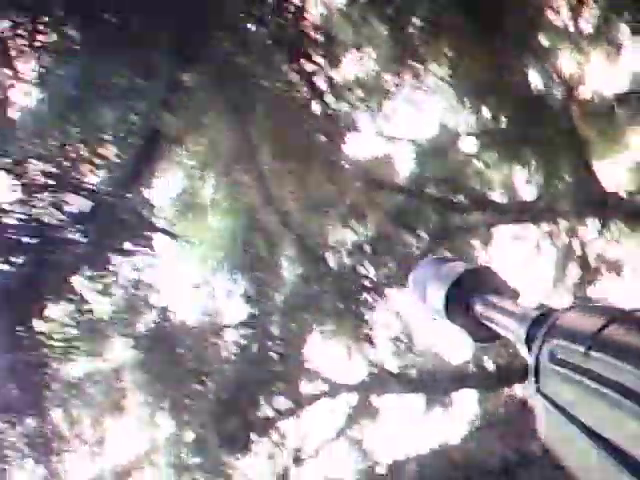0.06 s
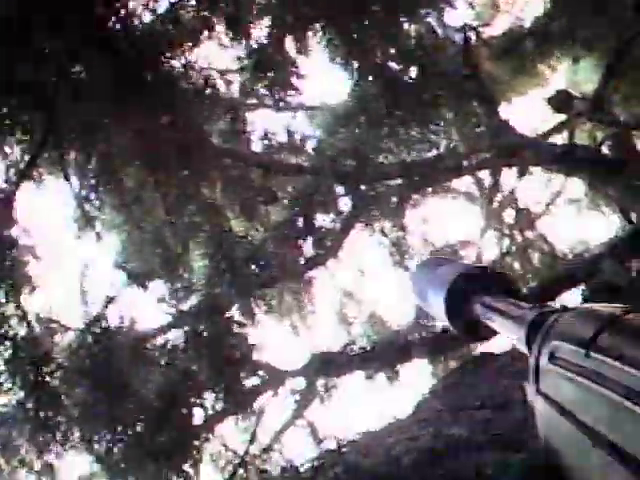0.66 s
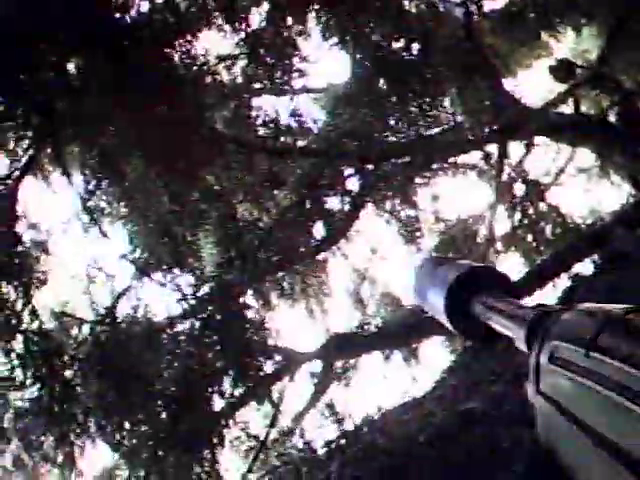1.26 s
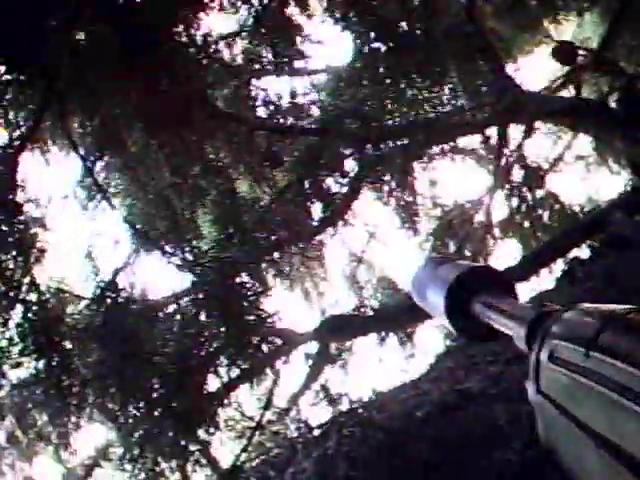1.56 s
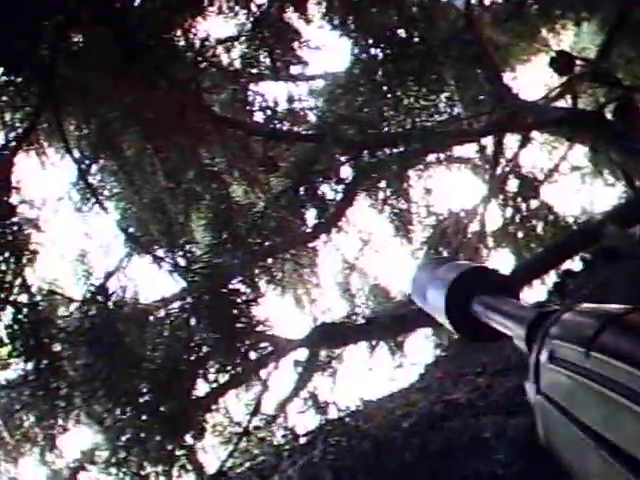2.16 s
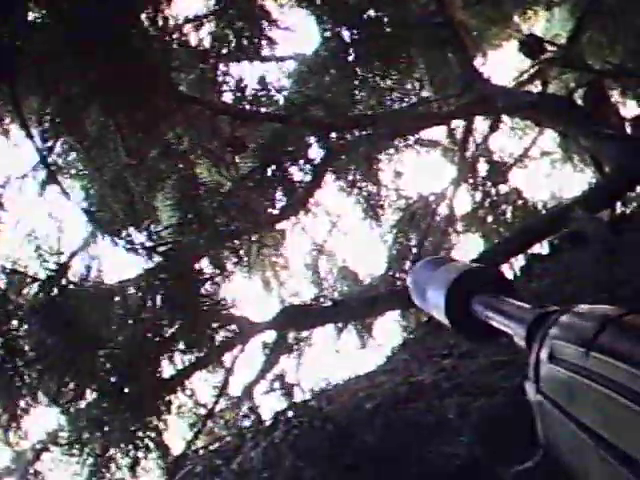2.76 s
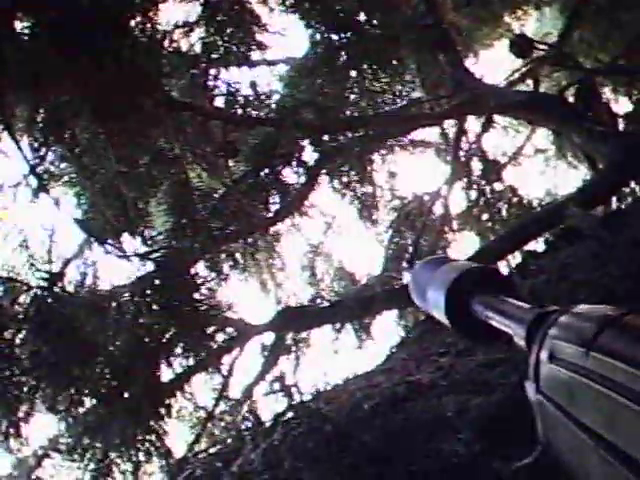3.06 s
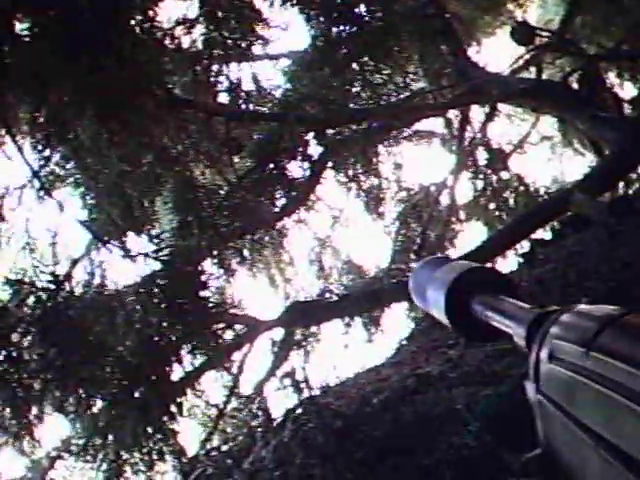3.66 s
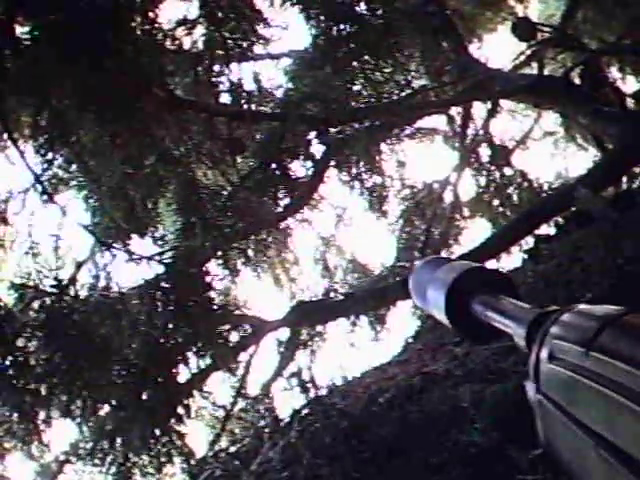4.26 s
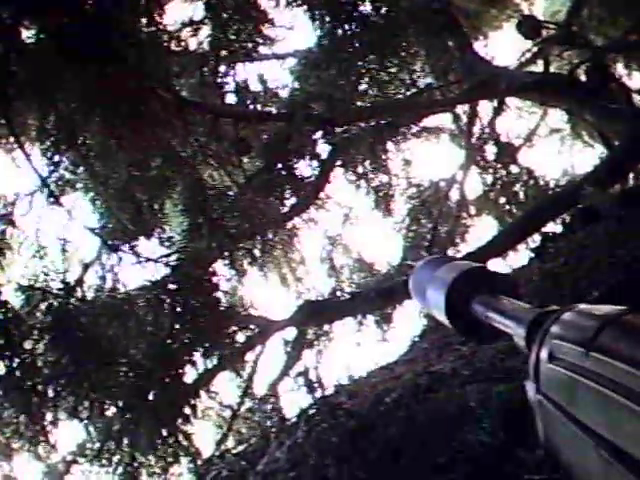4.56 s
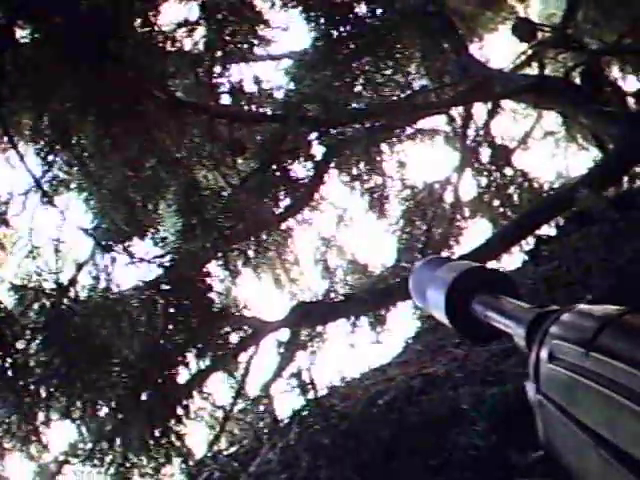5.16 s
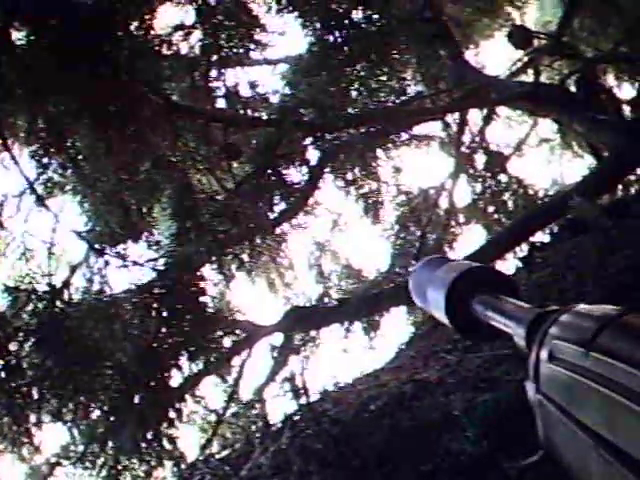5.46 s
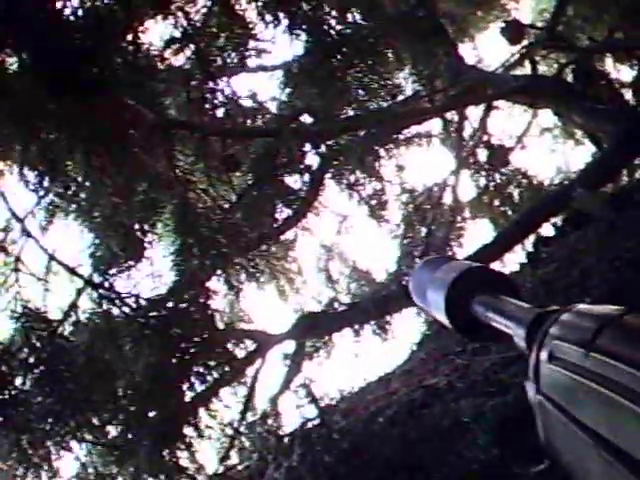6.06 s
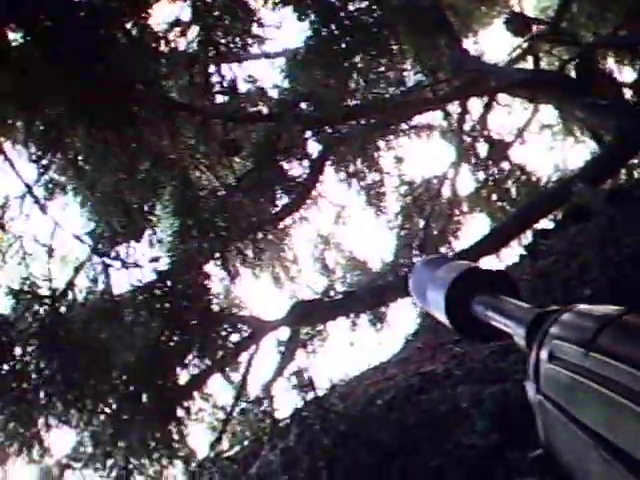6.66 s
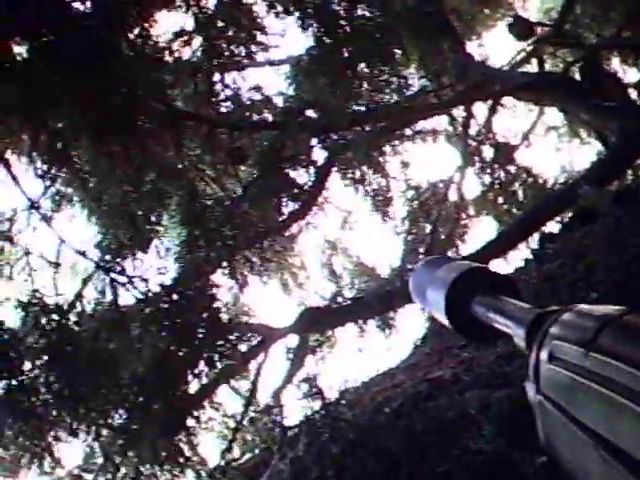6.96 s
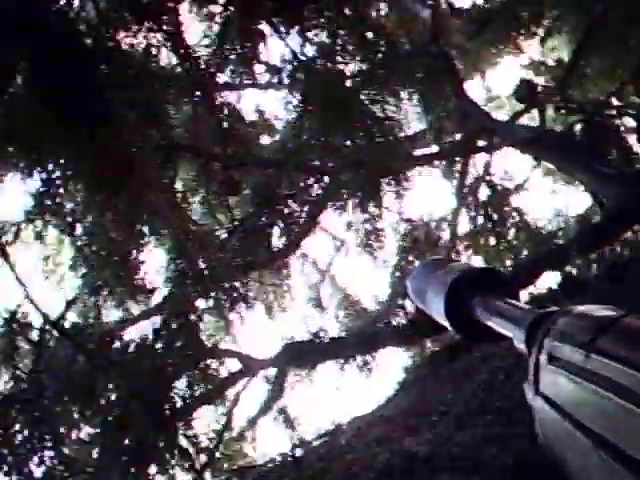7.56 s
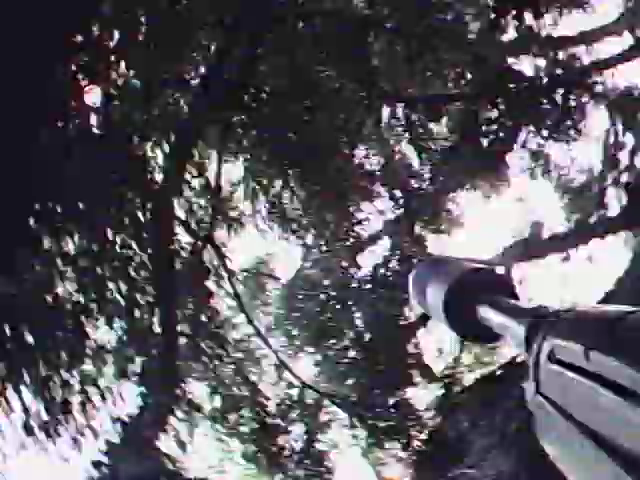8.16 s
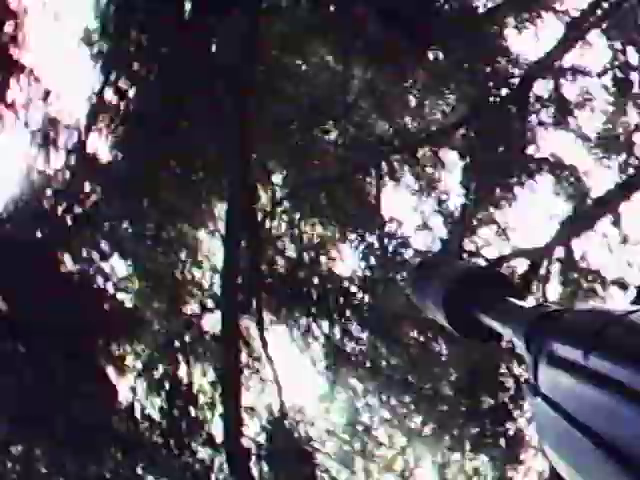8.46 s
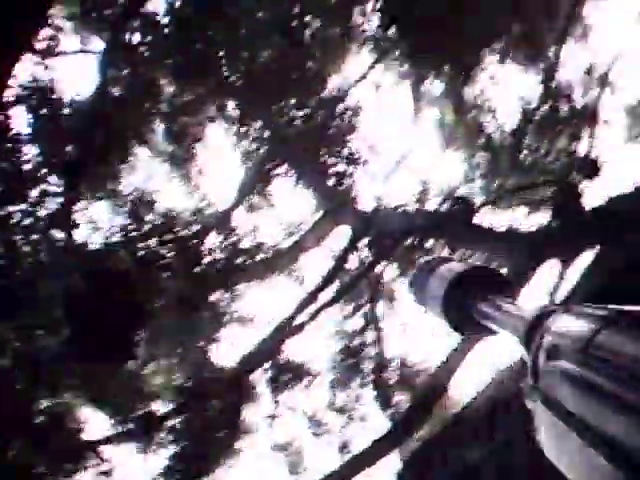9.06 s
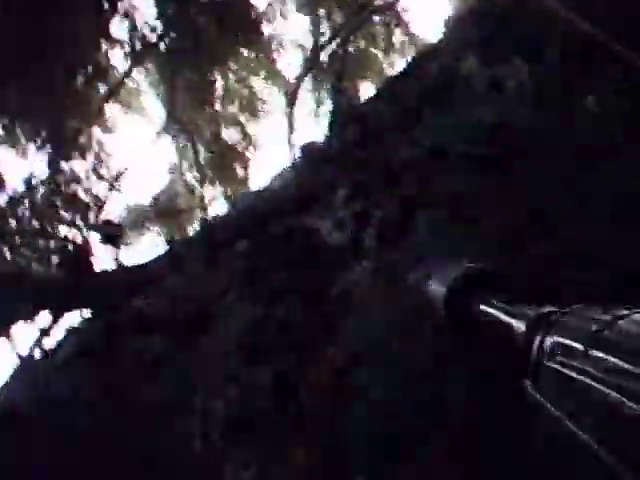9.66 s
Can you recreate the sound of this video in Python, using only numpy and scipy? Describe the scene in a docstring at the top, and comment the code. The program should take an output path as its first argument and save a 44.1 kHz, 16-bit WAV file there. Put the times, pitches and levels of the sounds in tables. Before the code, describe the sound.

Dull knocks, clicks and sleeve scraping on a handled rifle, heard through a camera clamped to it, over faint hiss and ticking.

```python
"""Knocks ring a small camera clamped to a rifle as it is aimed up into a tree, held still, then swung down.
Each knock travels through the mount, rings the camera's case and rocks the whole camera. A tight joint
creaks, hands and a sleeve scrape along the stock, and loose fittings tap. Underneath, the electronics
hiss and tick. It all sounds dull, as the camera keeps no high treble, and the hardest jolt overloads it."""
import sys
import numpy as np
from scipy import signal
from scipy.fft import rfft, irfft
from scipy.io import wavfile
from scipy.ndimage import uniform_filter1d

SR = 44100
rng = np.random.default_rng(int(sys.argv[2]) if len(sys.argv) > 2 else 0)


def to_wav(s):
    """Save 16-bit WAV."""
    ch = np.atleast_2d(s).T  # columns
    pcm = np.round(np.clip(ch, -1, 1) * 32767)  # PCM
    wavfile.write(sys.argv[1], SR, pcm.astype(np.int16))


N = 437472
TIME = np.arange(N) / SR
RING_SAMPLES = 20000

# knocks on rifle and mount: t/s, strength/dB, hardness (treble tilt)/dB, rocking relative to strength/dB
KNOCKS = [(0.425, -26, -3.5, 4.5), (0.742, -35.5, -4, -1), (1.198, -11, 4, -19.5), (2.105, -28.5, -1.5, 0),
          (2.18, -37.5, -5, 7.5), (2.358, -7, 2.5, -11.5), (2.473, -36.5, -16, 4.5), (2.61, -21.5, -4, -5),
          (2.656, -24.5, -3.5, 3), (2.668, -11, 5.5, -17), (2.913, -46, -16, -3), (3.124, -37.5, 1, -3),
          (4.232, -33.5, -11, 3.5), (4.375, -19.5, 0.5, -15.5), (4.46, -33, 3.5, -16), (5.007, -36, -1, -6),
          (5.359, -30.5, 4.5, -18), (5.495, -30.5, -9, -9), (7.085, -26.5, -4.5, -11),
          (7.138, -19, -1, -13), (7.148, -23, -2.5, -7), (7.231, -29.5, -5, -13), (7.281, -30, 11.5, 2),
          (7.332, -34.5, -9.5, -4.5), (7.375, -5.5, 3, -14.5), (7.444, -33.5, 0.5, -2.5),
          (7.906, -35, 0.5, -7.5), (8.134, -28, -7, 5), (8.162, -31, -20, -0.5), (8.285, -17.5, -7.5, -5.5),
          (8.296, -12, -4.5, -28), (8.317, -12.5, 7, -11), (8.425, -19.5, 9, -18), (8.44, -26, 7.5, -19),
          (8.534, -5, 4.5, -19), (8.546, 0, 1, -1.5), (8.562, -16, 3.5, 9.5), (8.616, -17, 0, 3),
          (8.666, -12, -2.5, -0.5), (8.674, -16.5, -4, -22.5), (8.698, -23, 3, 7),
          (9.159, -22.5, -1.5, -3.5), (9.331, -15.5, 7, -18), (9.409, -25.5, 3, 4), (9.418, -7.5, 2, -3.5),
          (9.563, -30, -13, -12), (9.605, -20, -4.5, 1), (9.634, -18, -6, 3.5), (9.739, -20.5, 6, -1)]
# slips of a tight joint under slow pressure: t/s, relative level/dB
JOINT_SLIPS = [(6.812, -36.5), (6.825, -37), (6.8385, -33), (6.857, -37.5), (6.913, -34), (6.958, -37.5),
               (7.015, -38.5)]
# short shifts of the hands: middle t/s, half length/s, scrape level/dB, rumble level/dB
GRIP_SHIFTS = [(0.25, 0.33, -46, -41), (0.282, 0.048, -51, -30.5), (0.78, 0.04, -49.5, -39),
               (2.07, 0.046, -48, -35.5), (2.45, 0.19, -48, -36), (2.759, 0.099, -46.5, -35.5),
               (3.164, 0.037, -48.5, -50), (3.815, 0.094, -52.5, -68), (4.243, 0.13, -58, -41),
               (4.702, 0.086, -54.5, -41.5), (5.083, 0.087, -51.5, -37.5), (7.171, 0.2, -52.5, -45.5),
               (7.46, 0.076, -35.5, -31.5), (7.854, 0.24, -54.5, -43.5)]
# loudness of the sliding sleeve as the rifle swings down: t/s, relative level/dB
SLEEVE_LEVELS = [(8.0, -57), (8.25, -49), (8.3, -40.5), (8.46, -38), (8.51, -45.5), (8.6, -31.5),
                 (8.75, -34), (8.84, -43.5), (9.03, -38), (9.11, -50.5), (9.23, -51.5), (9.3, -40.0),
                 (9.47, -41.0), (9.55, -56), (9.79, -36.5), (9.84, -46), (9.92, -39.5)]

# A mode is one tone that a part rings with. All five tables: f/Hz, time to fade 60 dB/s, relative level/dB
ROCKING_MODES = [(121.4, 0.25, 2), (96.7, .08, -3), (64.3, 0.13, -17), (181.6, 0.13, -6)]  # the whole camera rocking on its mount
BODY_MODES = [(256, 0.012, -12), (357.8, 0.062, -3), (414, 0.034, -3.5), (575.6, 0.035, -1.5),
              (662.4, 0.09, -4), (668.6, 0.079, 0)]  # its hollow body
CASE_MODES = [(1035, 0.13, -19.5), (1076, 0.15, -15), (1234, 0.025, 3.5), (1295, 0.072, -6.5),
              (1366, 0.032, 1), (1760, 0.064, -20)]  # its case
CLICK_MODES = [(1930, 0.0065, -14.5), (2520, 0.017, -6), (2930, 0.009, 1), (3060, 0.017, -7.5),
               (3520, 0.0036, -20)]  # the bright edge of a knock
JOINT_MODES = [(160, .07, -6), (380, .03, -4), (560, .02, -7), (950, .015, -10), (1290, .034, -1),
               (1410, .032, 0), (1600, .015, -9), (2800, .012, -16)]  # the creaking joint

# A colour says how strong a noise is from low to high. All three tables: f/Hz, relative level/dB
SCRAPE_COLOUR = [(130, -36), (230, -16), (340, 2), (470, -4), (560, -3.5), (680, 5.5), (810, -17.5),
                 (1000, -4.5), (1380, -1), (1900, -20.5), (2550, -16), (3050, -16), (3500, -29.5),
                 (4300, -17)]  # rubbing on the stock
RUMBLE_COLOUR = [(25, -31), (50, -16.5), (75, 3.5), (105, -3), (122, 7.5), (145, -2.5), (175, -1),
                 (230, -28.5), (400, -49)]  # the shaking mount
HISS_COLOUR = [(25, -18.5), (60, -2.5), (110, -1.5), (160, -3), (260, -10), (480, -13.5), (700, -21),
               (1100, -20.5), (1700, -25.5), (3300, -26.5), (3700, -28.5), (4300, -33.5)]  # the electronics


def undb(db):
    """Turn decibels into a factor to multiply by."""
    return 10 ** (np.asarray(db) / 20)


def unit(x):
    """Scale x to an average (rms) level of 1."""
    return x / np.sqrt(np.mean(x ** 2))


def add(out, start_s, x):
    """Mix x into out, starting at start_s."""
    i = max(int(start_s * SR), 0)
    out[i:i + len(x)] += x[:len(out) - i]


def band(x, kind, hz, order):
    """Keep the "low", "high" or middle ("band") part of x; a higher order cuts more steeply."""
    return signal.sosfilt(signal.butter(order, hz, kind, fs=SR, output="sos"), x)


def colour(x, points):
    """Give x a colour from a table; the result has an average level of 1."""
    hz, db = np.transpose(points)
    log_hz = np.log(np.fft.rfftfreq(N, 1 / SR) + 1)
    log_gain = np.log(undb(np.interp(log_hz, np.log(hz), db)))
    # fold the filter so that it rings only after a click, never before
    cepstrum = irfft(log_gain, N)
    cepstrum[1:N // 2] *= 2
    cepstrum[N // 2 + 1:] = 0
    return unit(irfft(rfft(x) * np.exp(rfft(cepstrum)), N))


def wander(steps_per_s):
    """A smooth random drift with a typical size of 1."""
    hold = int(SR / steps_per_s)
    steps = np.repeat(rng.standard_normal(N // hold + 1), hold)
    return unit(uniform_filter1d(uniform_filter1d(steps, hold), hold)[:N])


def contact(length_s, chatter):
    """The push of a hard first touch, followed by a dying chatter of tiny bounces."""
    t = np.arange(RING_SAMPLES) / SR
    fade = np.exp(-(t / length_s) ** 2)
    push = chatter * rng.standard_normal(RING_SAMPLES) * fade / np.sqrt(length_s * SR)
    push[0] += 1
    return push


def ring(push, modes, detune):
    """A push rings a part's tones, tuned a little differently each time; the loudest 6 ms have level 1."""
    t = np.arange(RING_SAMPLES) / SR
    tones = 0
    for k, (hz, fade_s, db) in enumerate(modes):
        pitch_hz = hz * (1 + detune * rng.standard_normal())
        fade = np.exp(-np.log(1000) * t / fade_s)
        tones += (-1) ** k * undb(db) * fade * np.sin(2 * np.pi * pitch_hz * t)
    ringing = signal.fftconvolve(push, tones)[:RING_SAMPLES]
    return ringing / np.sqrt(uniform_filter1d(ringing ** 2, size=265).max())


def electronics(first_tick_s=.0164, period_s=.04286):
    """Steady hiss, and a dull tick each time the camera draws current to store data."""
    ticks = np.zeros(N)
    count = int((TIME[-1] - first_tick_s) / period_s)
    t = np.arange(int(period_s * SR)) / SR
    for k in range(count):
        level_luck, dip_luck, delay_luck = rng.standard_normal(3)
        # every fourth tick is faint; the pattern slips by one halfway through
        faint = (k + (k > count // 2)) % 4 == 2
        level_db = -31.5 - 8.7 * faint + level_luck
        # the power supply dips sharply, then bounces back more slowly
        dip = undb(2 * dip_luck) * np.exp(-((t - .002) / .00078) ** 2)
        rebound = .86 * np.exp(-((t - .0046 - .0012 * delay_luck) / .0017) ** 2)
        add(ticks, first_tick_s + k * period_s, (rebound - dip) * undb(level_db))
    hiss = undb(-48.5) * colour(rng.standard_normal(N), HISS_COLOUR)
    return band(ticks, "high", hz=70, order=1) + hiss


def friction(scrape_gain, rumble_gain, catches_per_s, spread_db, patchy_db):
    """Cloth and skin catch and let go in many tiny clicks; the uneven drag shakes the mount."""
    catches = (rng.random(N) < catches_per_s / SR) * rng.standard_normal(N)
    size_db = spread_db * np.minimum(rng.exponential(size=N), 4) + patchy_db * wander(35)
    scrape = colour(catches * undb(size_db), SCRAPE_COLOUR)
    # the touching point moves about, feeding now the hollow tones, now the bright ones
    hollow = band(scrape, "low", hz=950, order=2)
    bright = scrape - hollow
    scrape = hollow * undb(3 * wander(28)) + bright * undb(2.2 * wander(40))
    rumble = colour(rng.standard_normal(N), RUMBLE_COLOUR)
    return scrape * scrape_gain + rumble * rumble_gain


def hand_rubs():
    """The hands settle with brief rubs; skin is softer than cloth, so they sound duller."""
    scrape_gain, rumble_gain = np.full(N, 1e-6), np.full(N, 1e-6)
    for middle_s, half_s, scrape_db, rumble_db in GRIP_SHIFTS:
        swell = np.exp(-((TIME - middle_s) / half_s) ** 2)
        scrape_gain += swell * undb(scrape_db)
        rumble_gain += swell * undb(rumble_db)
    rub = friction(scrape_gain, rumble_gain, catches_per_s=2500, spread_db=2.6, patchy_db=2.5)
    return band(rub, "low", hz=2300, order=2)


def fitting_taps(taps_per_shift=2):
    """Each shift of the hands jiggles faint taps out of loose fittings, louder for a firmer rub."""
    out = np.zeros(N)
    for middle_s, half_s, scrape_db, _ in GRIP_SHIFTS:
        times_s = middle_s + half_s * rng.uniform(-1.2, 1, taps_per_shift)
        strengths_db = scrape_db + 5.5 + 2.5 * rng.standard_normal(taps_per_shift)
        for start_s, strength_db in zip(times_s, strengths_db):
            add(out, start_s, strike(strength_db, hardness_db=-3, rocking_db=-3.5))
    return out


def joint_creak():
    """The joint sticks and lets go, quickly at first and then in single slips."""
    out = np.zeros(N)
    for start_s, db in JOINT_SLIPS:
        slip = ring(contact(length_s=.003, chatter=.6), JOINT_MODES, detune=.008)
        add(out, start_s, undb(db + 2.5) * slip)
    return out


def sleeve_slide():
    """The sleeve drags along the stock and shakes the mount; the weave of the cloth adds a rasp."""
    slide_db = np.interp(TIME, *np.transpose(SLEEVE_LEVELS), left=-120) + 4
    rumble_db = -11 + .65 * slide_db
    slide = friction(undb(slide_db), undb(rumble_db), catches_per_s=9000, spread_db=3.5, patchy_db=1)
    rasp = band(slide, "band", hz=[1980, 3400], order=1)
    return slide + undb(-6) * rasp


def strike(strength_db, hardness_db, rocking_db):
    """One blow clicks, rings the case and body, and rocks the whole camera on its mount."""
    click = ring(contact(length_s=.005, chatter=.48), CLICK_MODES, detune=.036)
    case = ring(contact(length_s=.0064, chatter=1.72), CASE_MODES, detune=.017)
    body = ring(contact(length_s=.011, chatter=.85), BODY_MODES, detune=.027)
    soft_push = np.hanning(int(.0051 * SR))
    thump = ring(soft_push, ROCKING_MODES, detune=.024)
    # a harder blow gives more bright click and less hollow body
    click *= undb(-17.5 + 1.14 * hardness_db)
    body *= undb(-7.5 - .66 * hardness_db)
    return undb(strength_db) * (click + undb(-6) * case + body + undb(rocking_db) * thump)


def knocks():
    """Hands and fittings knock against the rifle and the mount."""
    out = np.zeros(N)
    for start_s, strength_db, hardness_db, rocking_db in KNOCKS:
        add(out, start_s, strike(strength_db, hardness_db, rocking_db))
    return out


def scene():
    """The handling reaches one dull microphone through the camera's body; the electronics add noise."""
    handling = knocks() + joint_creak() + hand_rubs() + sleeve_slide() + fitting_taps()
    heard = band(handling, "low", hz=3570, order=7)
    return (heard + electronics())[None]


def steep_cut(x, top_hz):
    """Remove nearly everything above top_hz."""
    return signal.sosfilt(signal.ellip(8, .2, 70, top_hz, fs=SR, output="sos"), x)


def record(dry):
    """The camera flattens loud peaks, drops out on the deepest ones and keeps only the range of speech."""
    limit = .68
    flattened = band(np.clip(dry, -limit, limit), "low", hz=3720, order=12)
    # the sound breaks up raggedly while the wave stays far below the lower limit
    overloaded = uniform_filter1d(dry, size=50, axis=-1) < -1.18 * limit
    dropout = overloaded * np.clip(.6 + wander(3200), 0, 1)
    narrow = steep_cut(flattened * (1 - dropout), top_hz=4280)
    # overshoots at the edges of the dropouts are flattened again, making thin bright spikes
    return steep_cut(np.clip(narrow, -.75, .75), top_hz=16000)


dry = scene()
out = record(dry)
to_wav(out)
```